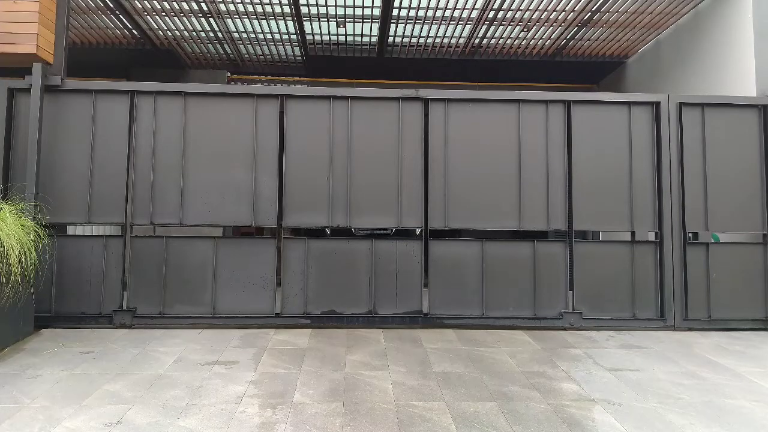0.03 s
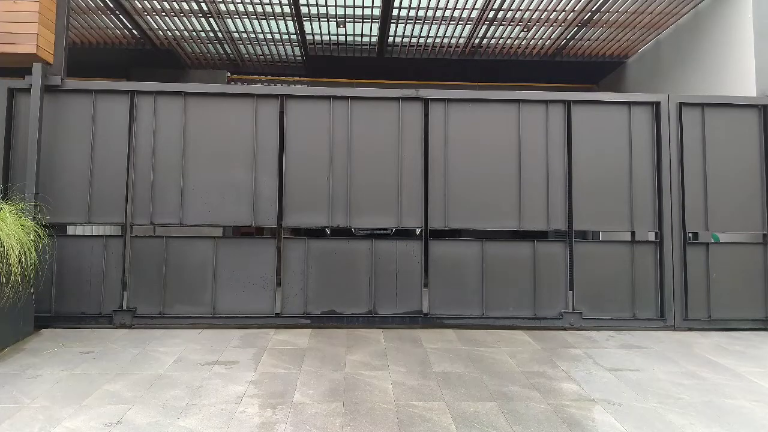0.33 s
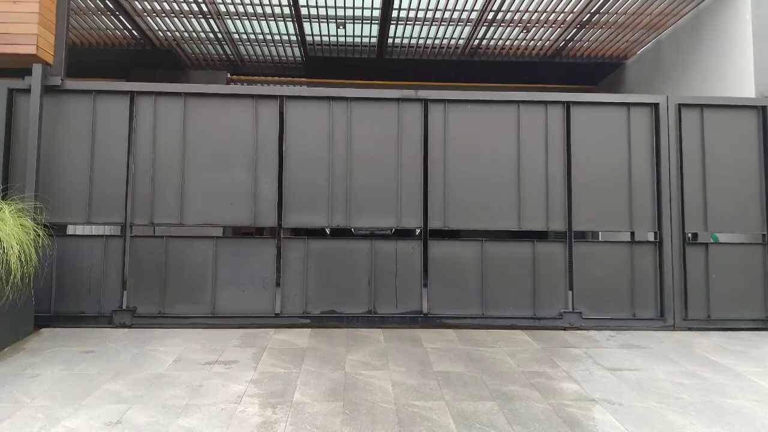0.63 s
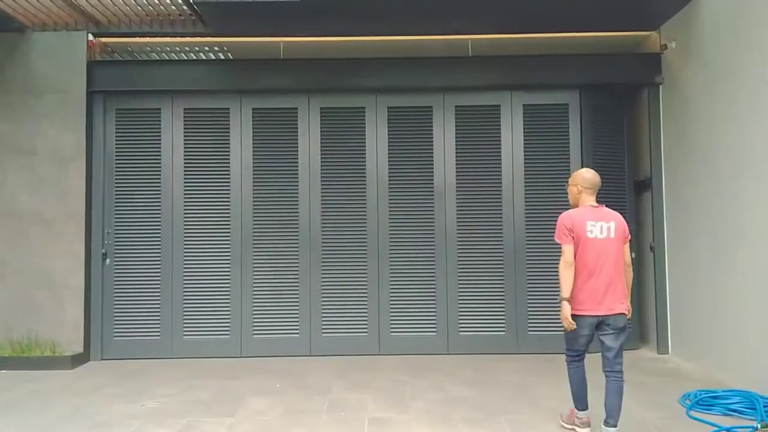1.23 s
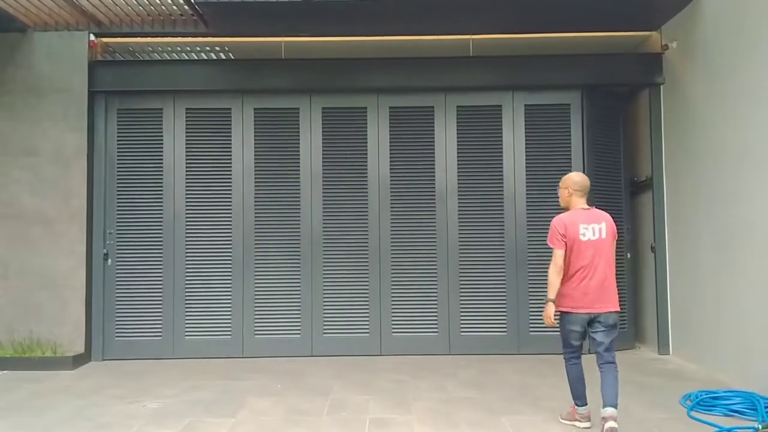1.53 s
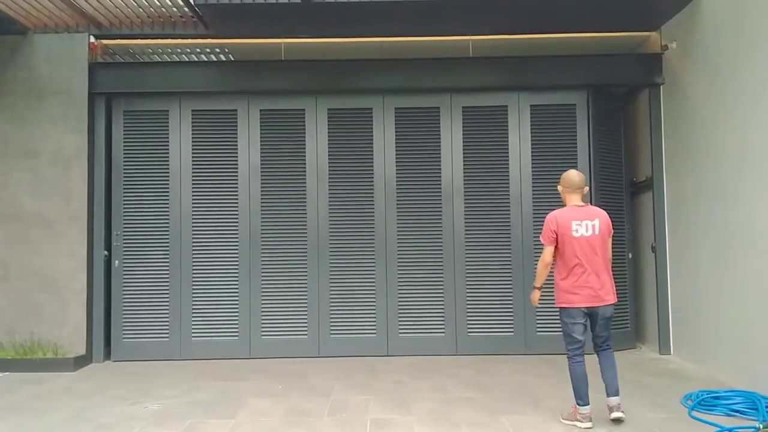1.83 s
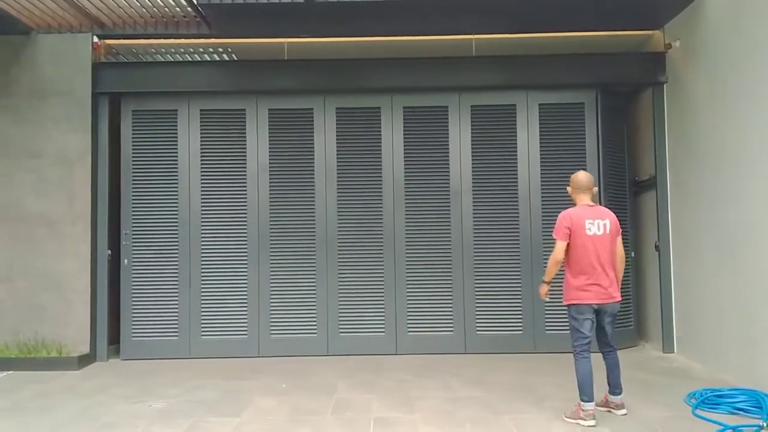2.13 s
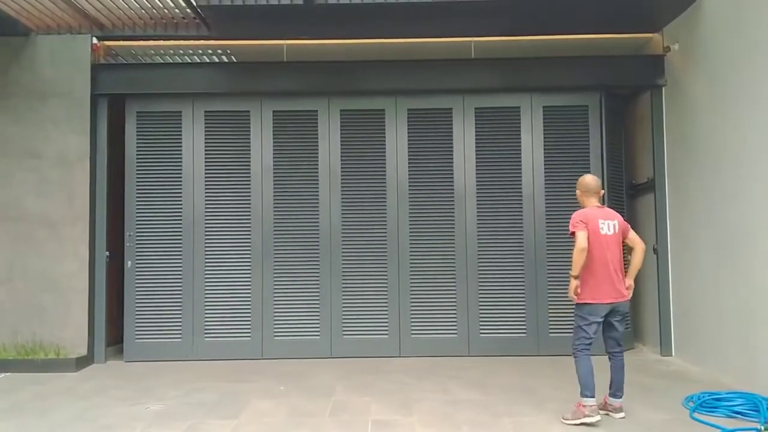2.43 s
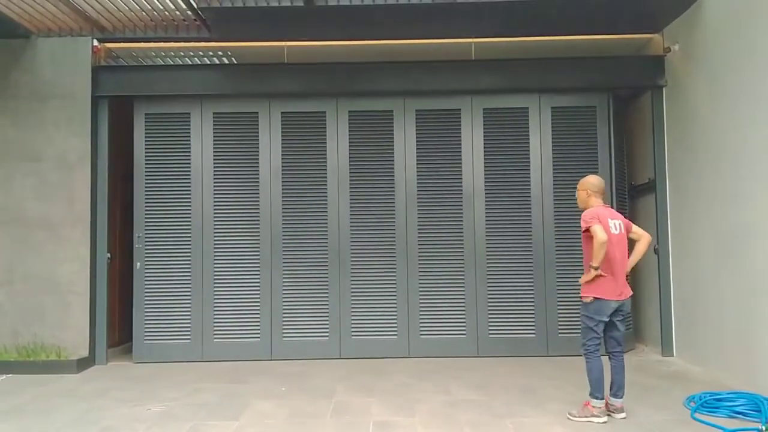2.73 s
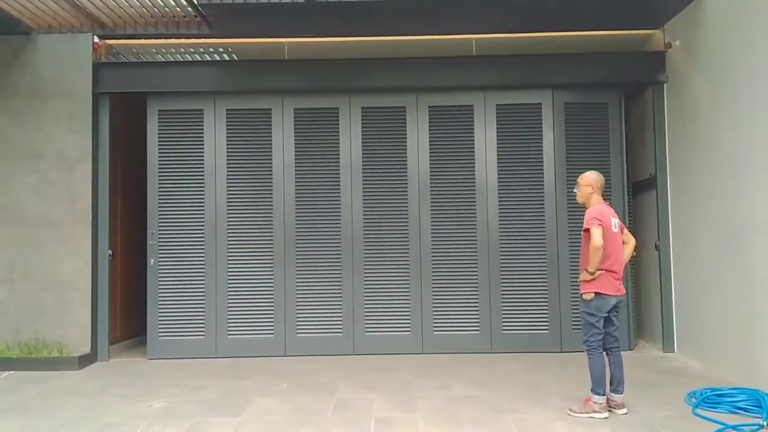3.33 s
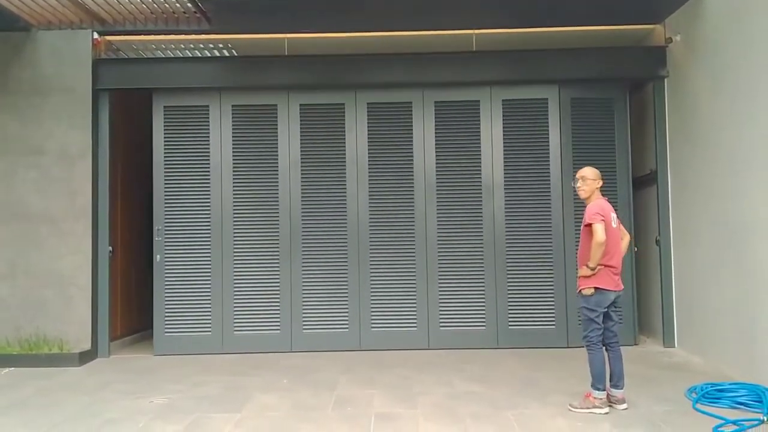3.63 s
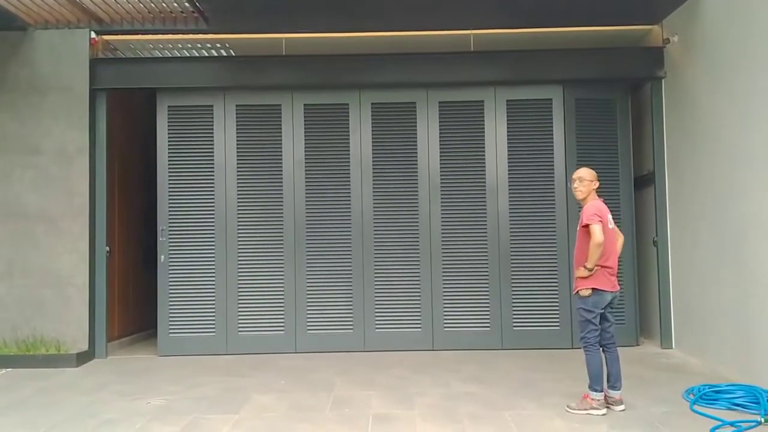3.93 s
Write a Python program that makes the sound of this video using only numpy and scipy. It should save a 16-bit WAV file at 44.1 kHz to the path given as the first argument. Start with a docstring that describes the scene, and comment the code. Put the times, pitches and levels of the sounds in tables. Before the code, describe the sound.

A motorised gate slides open in an outdoor driveway. After quiet street air and a brief silence, its rollers rumble and its metal panels ring, with hissy scrapes, ticks, a low shudder and a groan over a faint motor hum.

```python
"""First you hear quiet street air with a thin squeal dying away, then a moment of dead silence.
A motorised gate slides open: its rollers rumble along the track and set the metal panels ringing.
The gate ticks and scrapes in hissy strokes, gives a low shudder, squeaks once and groans as it drags.
Behind it are the motor's faint hum, the whine of its gears and the soft air of the yard."""
import sys
import numpy as np
from scipy import signal
from scipy.fft import rfft, irfft
from scipy.io import wavfile

SR = 44100
rng = np.random.default_rng(int(sys.argv[2]) if len(sys.argv) > 2 else 0)


def log_audio(samples):
    """Write samples as a 16-bit WAV file to the path given in sys.argv[1]."""
    # one column per channel
    frames = np.atleast_2d(samples).T
    # limit to full scale, then quantise
    limited = np.clip(frames, -1, 1)
    pcm = np.round(limited * 32767).astype(np.int16)
    wavfile.write(sys.argv[1], SR, pcm)


N = 176400
SILENT_FROM_S, SILENT_TO_S = .66, 1.034

# How loud the track, the panels and the frame are. Each row: time in seconds, level in dB.
TRACK_LEVELS = [(1.04, -66), (1.3, -53), (1.62, -46), (1.8, -46), (1.87, -49), (2.0, -46.5), (2.25, -51),
                (2.4, -49.5), (2.66, -44.5), (2.95, -47.5), (3.5, -46.5), (4.0, -47.5)]
PANEL_LEVELS = [(1.04, -70), (1.5, -54), (1.79, -43.5), (1.87, -49.5), (1.98, -45.5), (2.12, -48),
                (2.2, -53), (2.45, -48), (2.58, -49.5), (2.76, -44.5), (2.96, -47.5), (3.25, -47.8),
                (4.0, -49.5)]
FRAME_LEVELS = [(1.04, -62), (1.5, -56), (1.65, -51.5), (2.25, -51), (2.7, -49), (3.0, -50.5), (3.7, -51.5),
                (4.0, -49)]
# The tone colour of the track and the frame. Each row: frequency in Hz, relative level in dB.
TRACK_COLOUR = [(200, -22), (520, -7.5), (900, -4.5), (1180, -1), (1450, -4), (1800, -1), (2350, -2),
                (2700, -8.5), (3600, -15.5), (4250, -13.5), (4700, -20.5), (9000, -30), (12500, -33),
                (15500, -26)]
FRAME_COLOUR = [(25, 3), (60, -3.5), (115, -2.5), (165, -2), (225, -9), (295, -5), (400, -13.5), (600, -12),
                (2000, -52)]
# The notes the panels ring at. Each row: pitch in Hz, width in Hz, relative level in dB.
PANEL_NOTES = [(690, 70, -2.5), (752, 45, -4), (811, 95, 0), (916, 113, -3)]

def rollers():
    """Roughness under the wheels shakes the track, the panels and the frame."""
    roughness = dict(per_s=5000, spread_db=2)
    flutter = amp(.45 * drift(21))
    track = level(TRACK_LEVELS) * colour(grit(**roughness), TRACK_COLOUR)
    frame = level(FRAME_LEVELS) * colour(grit(**roughness), FRAME_COLOUR)
    panels = sum(amp(db) * resonate(grit(**roughness), hz, width) for hz, width, db in PANEL_NOTES)
    return flutter * (track + level(PANEL_LEVELS) * unit(panels) + frame)


# The scraping strokes. Each row: start in seconds, level in dB, seconds to rise,
# seconds to fall by 12 dB, extra top treble in dB.
SCRAPE_STROKES = [(1.355, -50.5, 0.035, 0.23, 6), (1.51, -48.5, .03, 0.24, 3),
                  (1.628, -50.5, 0.0083, .06, 2), (2.23, -56, 0.033, .2, 12), (2.297, -44, 0.012, 0.11, 4),
                  (2.31, -44, 0.096, 0.3, 5), (2.6, -51, 0.049, .2, -8), (2.99, -54, 0.023, .2, -10),
                  (3.335, -59, .01, 0.28, 15), (3.553, -48.5, 0.018, .13, 4), (3.6, -42, 0.07, 0.2, 1),
                  (3.85, -47, 0.0087, 0.08, -2), (3.9, -46, 0.013, .25, 3), (3.938, -40.5, 0.011, 0.079, 3)]
# The tone colour of a scrape. Each row: frequency in Hz, relative level in dB.
SCRAPE_COLOUR = [(300, -13), (1300, -2), (1900, 5), (2400, 7), (2750, -5), (3100, 1), (3750, -12.5),
                 (4250, 2.5), (4700, -1), (7000, -1), (8300, -3.5), (9000, -14), (10300, -11.5),
                 (12000, -24), (13200, -20), (15500, -19)]
TREBLE_FROM_HZ = 10400

def scrapes():
    """Rubbing makes fine grains of sound, in strokes that swell quickly and die away."""
    t = clock()
    grains = amp(.45 * drift(40)) * colour(grit(per_s=9000, spread_db=1), SCRAPE_COLOUR)
    treble = signal.sosfiltfilt(signal.butter(2, TREBLE_FROM_HZ, "high", fs=SR, output="sos"), grains)
    power, treble_power = 0, 0
    for start, db, rise, fade, treble_db in SCRAPE_STROKES:
        fallen_db = 12 * (np.maximum(t - start - rise, 0) / fade) ** 1.43
        stroke = np.clip((t - start) / rise, 0, 1) * amp(db - fallen_db)
        power += stroke ** 2
        treble_power += (stroke * amp(treble_db)) ** 2
    return np.sqrt(power) * (grains - treble) + np.sqrt(treble_power) * treble


# How loud the groan's main note is. Each row: time in seconds, level in dB.
GROAN_LEVELS = [(3.0, -72), (3.28, -56), (3.42, -46.5), (3.64, -58), (4.0, -53)]

def groan():
    """Dragging keeps the two lowest panel notes singing."""
    lower, main = (tone(hz, waver=.014, flutter_db=3.5) for hz, _, _ in PANEL_NOTES[:2])
    return level(GROAN_LEVELS) * (main + amp(-4) * lower)


def joint():
    """A roller crosses a joint in the track, and the jolt briefly rings the main panel note."""
    return knock(start_s=3.401, peak_db=-35, hz=PANEL_NOTES[1][0], rise_s=.012)


# Dull bumps of the rollers. Each row: start in seconds, peak level in dB, pitch in Hz.
ROLLER_BUMPS = [(2.064, -49, 56.5), (2.526, -38.5, 50)]
SHUDDER_MIDDLE_S, SHUDDER_HALF_LENGTH_S = 2.56, .24

def shudder():
    """The heavy gate shakes for a moment and knocks over uneven spots."""
    swell = np.exp(-((clock() - SHUDDER_MIDDLE_S) / SHUDDER_HALF_LENGTH_S) ** 4)
    shake = amp(-47) * swell * resonate(rng.standard_normal(N), hz=73, width_hz=60)
    return shake + sum(knock(start, db, hz, rise_s=.018) for start, db, hz in ROLLER_BUMPS)


# Sharp ticks on the track. Each row: start in seconds, level in dB, seconds to fall by 60 dB.
TRACK_TICKS = [(1.633, -53.5, .17), (2.299, -49.5, .16), (3.672, -55, .1), (3.857, -59, .1)]
# The tone colour of a tick. Each row: frequency in Hz, relative level in dB.
TICK_COLOUR = [(1000, -14), (7000, 3), (9000, -2), (15500, -2)]
TICK_RISE_S = .003

def ticks():
    """Metal strikes metal in short, bright crunches."""
    strikes = 0
    for start, db, fade in TRACK_TICKS:
        age = np.maximum(clock() - start, 0)
        strikes += np.minimum(age / TICK_RISE_S, 1) * amp(db - 60 * age / fade)
    return strikes * colour(grit(per_s=2500, spread_db=3), TICK_COLOUR)


SQUEAK_START_S, SQUEAK_LENGTH_S, SQUEAK_FROM_HZ, SQUEAK_TO_HZ = 3.06, .147, 7200, 4500

def squeak():
    """The gate gives one thin squeak that slides down in pitch."""
    progress = np.clip((clock() - SQUEAK_START_S) / SQUEAK_LENGTH_S, 0, 1)
    hz = SQUEAK_FROM_HZ + (SQUEAK_TO_HZ - SQUEAK_FROM_HZ) * progress
    return amp(-61.5) * np.sin(np.pi * progress) * resonate(rng.standard_normal(N), hz, width_hz=170)


# The motor's hum. Each row: multiple of the turning rate, level in dB before the hum eases.
HUM_NOTES = [(3, -67), (4, -64.5), (5, -70.5), (6, -65.5), (7, -71.5), (8, -69), (9, -67.5), (10, -61.3)]
# Notes that come in once the gate is under way. Each row: pitch in Hz, level in dB.
DRIVE_NOTES = [(108, -61.5), (298, -69), (2062, -63)]
# The gears. Each row: pitch in Hz, width in Hz, starting level in dB, level under way in dB.
GEAR_WHINE = [(9900, 170, -81, -84), (11230, 170, -77, -76.5)]
TURNS_PER_S, HUM_FADE_IN_S, UNDER_WAY_S, HUM_EASE_DB = 48.45, .2, 2.36, 14

def motor():
    """The hum of the straining motor gives way to the drive's own notes; the gears whine throughout."""
    under_way = (1 + np.tanh((clock() - UNDER_WAY_S) / .1)) / 2  # goes smoothly from 0 to 1
    fade_in = np.clip((clock() - SILENT_TO_S) / HUM_FADE_IN_S, 0, 1)
    hum = sum(amp(db) * tone(multiple * TURNS_PER_S) for multiple, db in HUM_NOTES)
    drive = sum(amp(db) * tone(hz) for hz, db in DRIVE_NOTES)
    whine = 0
    for hz, width, first_db, later_db in GEAR_WHINE:
        db = first_db + (later_db - first_db) * under_way
        whine += amp(db) * resonate(rng.standard_normal(N), hz, width)
    return fade_in * amp(-HUM_EASE_DB * under_way) * hum + under_way * drive + whine


# How long the porch echoes. Each row: frequency in Hz, seconds to fall by 60 dB.
ECHO_TIMES = [(200, 0.48), (2000, 0.62), (12000, 0.085)]

def porch(x, echo_db=-9.5):
    """Sound bounces off the walls and roof, adding a short, blurred echo."""
    hz, t, noise = signal.stft(rng.standard_normal(SR // 2), SR, nperseg=256)
    fade = amp(-60 * t / look_up(ECHO_TIMES, hz)[:, None])
    _, tail = signal.istft(noise * fade, SR, nperseg=256)
    echo = signal.fftconvolve(x, tail / np.linalg.norm(tail))[:N]
    return (x + amp(echo_db) * echo) / np.hypot(1, amp(echo_db))


# The tone colour of the street air. Each row: frequency in Hz, relative level in dB.
STREET_COLOUR = [(15, -29), (25, 1), (233, -14), (421, -13.5), (457, -19.5), (741, -20.5), (1620, -24),
                 (2630, -27), (4200, -34), (5800, -43), (8200, -44), (11000, -51), (15500, -46.5)]
# A distant squeal. Each row: pitch in Hz, width in Hz, starting level in dB.
SQUEAL_NOTES = [(6290, 150, -66), (6600, 200, -69), (12550, 330, -72.5), (13020, 330, -74)]
SQUEAL_FADE_DB_PER_S = 75

def street():
    """Soft outdoor air, with a distant squeal fading out."""
    air = amp(-47.9 + .8 * drift(18)) * colour(rng.standard_normal(N), STREET_COLOUR)
    squeal = sum(amp(db) * resonate(rng.standard_normal(N), hz, width) for hz, width, db in SQUEAL_NOTES)
    return air + squeal * amp(-SQUEAL_FADE_DB_PER_S * clock())


# The tone colour of the yard air. Each row: frequency in Hz, relative level in dB.
YARD_COLOUR = [(30, 3), (95, 5), (140, -1), (200, -6), (400, -6), (900, -4.5), (1900, -2.5), (2500, -6),
               (3600, -20), (7500, -16), (9000, -23.5), (13000, -32), (15500, -28.5)]

def yard():
    """A steady hush of air behind the gate."""
    return amp(-52.1) * colour(rng.standard_normal(N), YARD_COLOUR)


def amp(db):
    """Turns decibels into a number to multiply by."""
    return 10 ** (np.asarray(db) / 20)


def unit(x):
    """Scales a sound to an average strength (rms) of 1."""
    return x / np.sqrt(np.mean(x ** 2) + 1e-20)


def clock():
    """The time of every sample, in seconds."""
    return np.arange(N) / SR


def level(curve):
    """A volume that follows rows of seconds and dB."""
    return amp(np.interp(clock(), *np.transpose(curve)))


def look_up(table, hz):
    """Reads between a table's rows, giving each octave equal room."""
    row_hz, values = np.transpose(table)
    return np.interp(np.log(hz + 1), np.log(row_hz), values)


def colour(x, table):
    """Gives a sound a tone colour, fading it out below 20 Hz, at strength 1."""
    hz = np.fft.rfftfreq(N, 1 / SR)
    return unit(irfft(rfft(x) * amp(look_up(table, hz)) * np.minimum(hz / 20, 1) ** 2, N))


def drift(rate_hz):
    """Slow random wandering, at strength 1."""
    hz = np.fft.rfftfreq(N, 1 / SR)
    return unit(irfft(rfft(rng.standard_normal(N)) / (1 + (hz / rate_hz) ** 4), N))


def resonate(x, hz, width_hz):
    """Rings at a steady or moving pitch, at strength 1; a smaller width gives a purer note."""
    spin = np.exp(2j * np.pi * np.cumsum(hz * np.ones(N)) / SR)
    decay = np.exp(-np.pi * width_hz / SR)
    smoothed = signal.lfilter([(1 - decay) ** 2], [1, -2 * decay, decay * decay], x / spin)
    return unit((spin * smoothed).real)


def grit(per_s, spread_db):
    """Tiny random impacts, a few of them larger."""
    size = amp(spread_db * np.minimum(rng.exponential(1, N), 4))
    return unit(size * rng.choice([-1, 1], N) * (rng.random(N) < per_s / SR))


def tone(hz, waver=.002, flutter_db=1):
    """A pure note with unsteady pitch and level; waver is a fraction of the pitch."""
    cycles = np.cumsum(hz * (1 + waver * drift(12))) / SR
    return amp(flutter_db * drift(10)) * np.sqrt(2) * np.sin(2 * np.pi * cycles)


def knock(start_s, peak_db, hz, rise_s):
    """A softly struck note that swells and dies away."""
    age = np.maximum(clock() - start_s, 0)
    return amp(peak_db) * age / rise_s * np.exp(1 - age / rise_s) * np.sin(2 * np.pi * hz * age)


def scene():
    """Street air, silence, then the moving gate."""
    t = clock()
    air = yard()
    gate = rollers() + porch(scrapes() + squeak() + ticks()) + groan() + joint() + shudder() + motor()
    return (street() * (t < SILENT_FROM_S) + (gate + air) * (t > SILENT_TO_S))[None]


def record(dry):
    """Cuts away the treble above 15750 Hz."""
    low_pass = signal.firwin(1023, 15750, window=("kaiser", 9), fs=SR)
    return signal.oaconvolve(dry, low_pass[None], "same")


dry = scene()
out = record(dry)
log_audio(out)
```